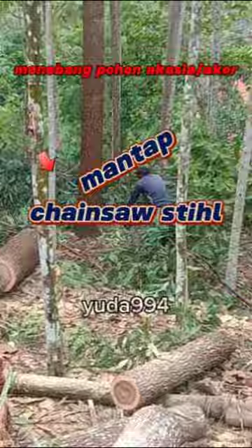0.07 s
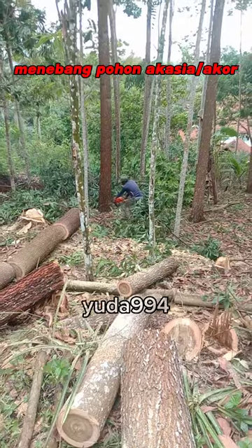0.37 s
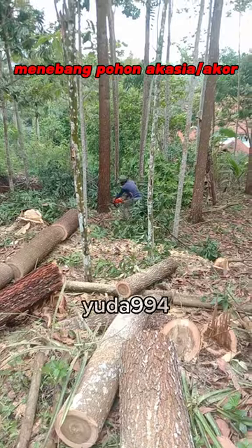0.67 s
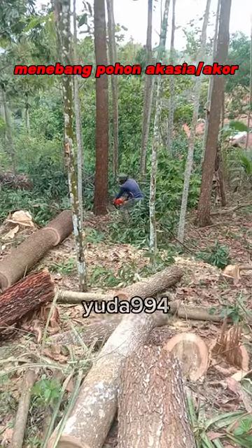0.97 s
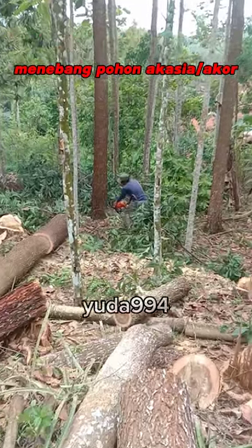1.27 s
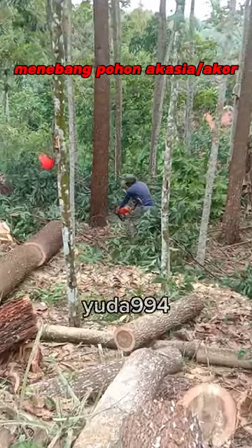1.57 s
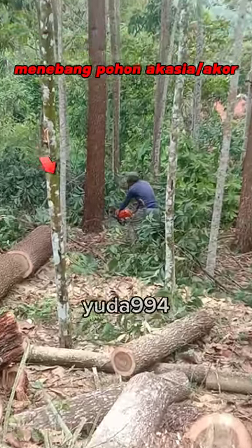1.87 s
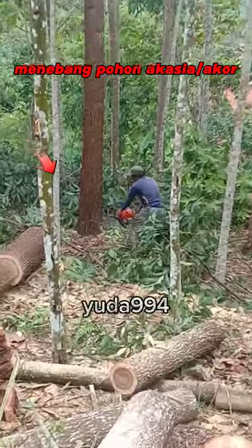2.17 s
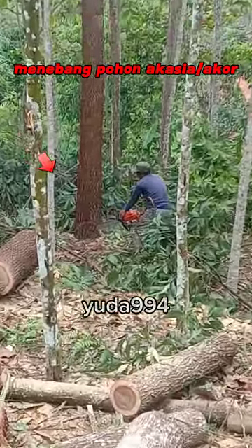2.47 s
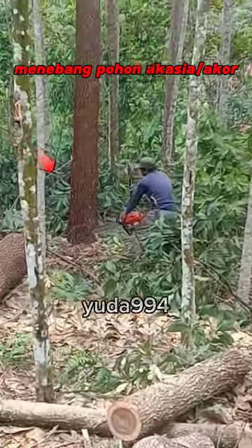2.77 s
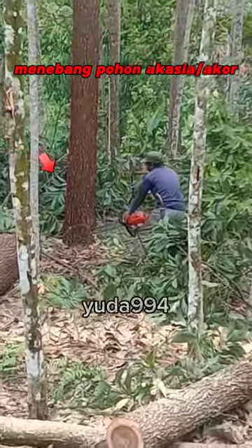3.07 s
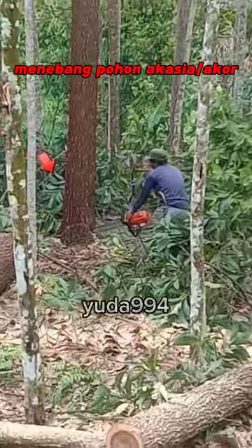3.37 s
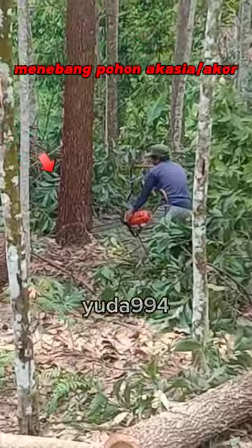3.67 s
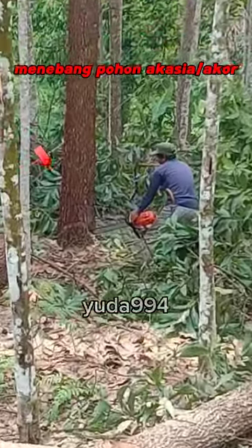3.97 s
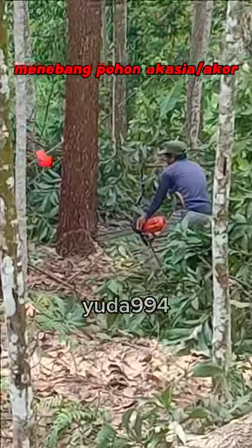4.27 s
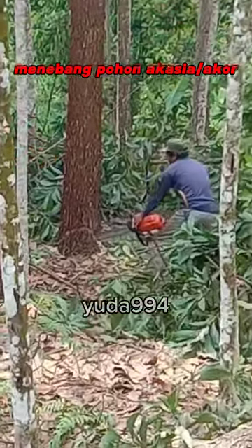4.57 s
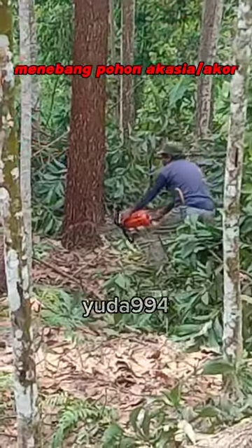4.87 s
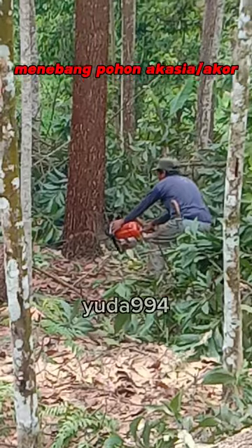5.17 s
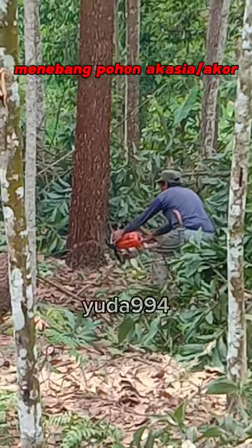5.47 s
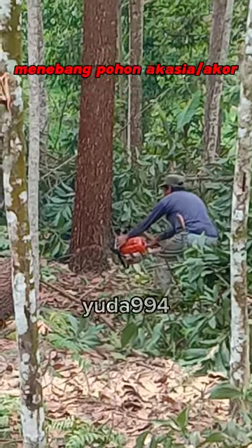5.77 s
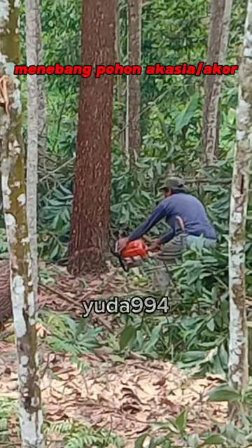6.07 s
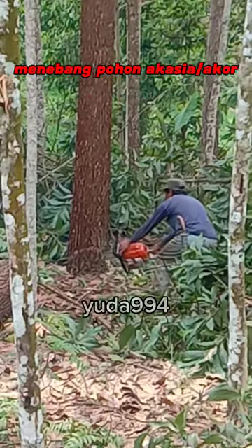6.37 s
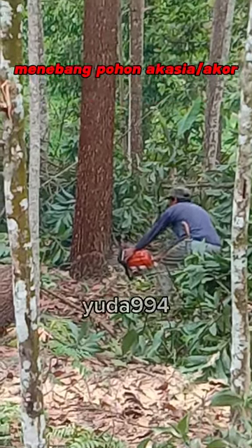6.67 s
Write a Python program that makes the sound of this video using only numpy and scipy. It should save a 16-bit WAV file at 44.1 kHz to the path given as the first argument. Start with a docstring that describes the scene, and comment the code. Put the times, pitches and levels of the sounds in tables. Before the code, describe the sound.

A two-stroke chainsaw cuts into the base of a tree, heard from some metres away in a wood. It fades in at high revs, sputters and sinks a little in pitch under load, while the chain rattles and hisses. About two thirds through, the throttle is let off for an instant; then the engine picks up with a slightly changed tone and climbs. Faint echoes come back from the trees.

```python
"""In a wood, some metres off, a two-stroke chainsaw cuts into the base of a tree.
Each firing is a pressure pulse that rings the muffler; the chain rattles and hisses on the ringing bar.
Engine speed follows the load: the exhaust rasps more at speed and sputters when it is dragged down.
The bar sinks into the trunk. The throttle is briefly let off: the pitch dips and the boom drops out.
It picks up as the saw is swung to a new angle, changing its colour. Trees echo; the air rumbles low."""
import sys
import numpy as np
from scipy import signal
from scipy.fft import rfft, irfft
from scipy.io import wavfile
from scipy.ndimage import uniform_filter1d

SR = 44100
rng = np.random.default_rng(int(sys.argv[2]) if len(sys.argv) > 2 else 0)


def wav_out(sig):
    """Save sig, one row per channel (or a flat mono array), as 16-bit PCM at SR to the path in sys.argv[1]."""
    wavfile.write(sys.argv[1], SR, np.round(np.clip(np.atleast_2d(sig).T, -1, 1) * 32767).astype(np.int16))


N = 295911
TIME = np.arange(N) / SR

LET_OFF = dict(start_s=4.49, attack_s=0.038, hold_s=0.26, release_s=0.14)   # the throttle is let off
DEEP = dict(start_s=1.6, attack_s=1.67, hold_s=1.5, release_s=0.65)   # the trunk muffles the buried bar


def exhaust(turns, rev, sputter, jitter_s=2e-5):
    """Pulse excitation: one firing a turn sets the pitch, and uneven combustion roughens the tone."""
    firings = np.arange(1, int(turns[-1]))
    firing_s = np.interp(firings, turns, TIME)
    uneven = np.interp(firing_s, TIME, sputter)
    volume_dev, timing_dev, front_dev, second_dev = rng.standard_normal((len(firings), 4)).T * uneven
    weak = misfires(firing_s, uneven)
    rebound = 0.63 * np.roll(weak, 1)   # unburnt fuel from a weak firing strengthens the next
    volume = puffs(firing_s, 1 + 0.094 * volume_dev - 0.95 * weak + rebound)
    front = puffs(firing_s + jitter_s * timing_dev, 1 + 0.11 * front_dev - 0.15 * weak)
    # a weaker puff later in each turn colours the harmonics; it all but vanishes with the swing
    second = puffs(np.interp(firings + 0.379, turns, TIME), 1 + 0.11 * second_dev)
    pair = front + np.interp(swing(), [0, 1], [0.36, 0.037]) * second
    return muffler_drone(volume, rev) + muffler_bark(pair) + gas_jet(front, turns, rev, sputter)


def misfires(firing_s, uneven, stumble_share=0.018, stumble_weakness=0.36):
    """Incomplete combustion: each firing's weakness, from set misfires and lesser random stumbles."""
    # weak firings: (time [s], weakness [0-1])
    weak_firings = [(0.419, 1), (0.452, 1), (0.485, 1), (0.779, 1), (0.806, 1), (0.848, 1), (1.079, 1),
                    (1.115, 1), (1.16, 1), (1.221, 0.8), (1.522, 0.75), (2.027, 1), (2.102, 0.8),
                    (2.217, 0.6), (2.278, 0.7), (2.584, 1), (2.804, 0.67), (3.072, 0.76), (3.559, 0.55),
                    (5.579, 0.64), (5.712, 0.92), (5.825, 1)]
    weak = stumble_weakness * (rng.random(len(firing_s)) < stumble_share * uneven)
    for time_s, weakness in weak_firings:
        weak[np.argmin(abs(firing_s - time_s))] = weakness
    return weak


def sputtering(firing_hz, rev):
    """Cyclic variation: the mixture burns unevenly at low speed, while slowing and off the throttle."""
    slowing_hz_per_s = np.maximum(-np.gradient(smooth(firing_hz, size=3000)) * SR, 0)
    return np.clip(0.85 - 0.1 * rev + 0.016 * slowing_hz_per_s + spell(**LET_OFF), 0, 1.5)


def muffler_drone(volume, rev):
    """Forced resonance: the puffs' volume drives the low modes, loudest where the firing rate suits."""
    # muffler modes near the first few harmonics: (frequency [Hz], width [Hz], level [dB])
    boom_modes = [(147.7, 67, 6)]
    octave_modes = [(270, 95, 2.5), (522, 87, -9)]
    body_modes = [(398.4, 95, 0)]
    # boom against engine speed: (revving [steps], level [dB])
    boom_tuning = [(-8, -34.5), (-0.6, -32.5), (0.26, -30.5), (1, -27), (0.4, -29.5), (2.2, -30)]
    # hum of the muffler body: (time [s], level [dB])
    body_levels = [(0.45, -45.5), (0.85, -41), (1.45, -50.5), (1.8, -42), (2.8, -45.5), (3.25, -38),
                   (3.6, -45), (4.3, -42), (4.47, -53), (5.0, -42), (6.1, -40.5), (6.7, -43)]
    throttle_shut = spell(start_s=4.47, attack_s=0.053, hold_s=0.03, release_s=0.07)
    boom_db = np.interp(rev, *np.transpose(boom_tuning)) - 18 * throttle_shut
    octave_db = -34.5 - 1.5 * abs(rev) + drift(3) - 2 * spell(**LET_OFF) + 0.5 * swing()
    boom = radiate(volume, boom_modes, boom_db)
    octave = radiate(volume, octave_modes, octave_db)
    return boom + octave + radiate(volume, body_modes, in_time(body_levels)[0])


def muffler_bark(pulses):
    """Impulse response: the sharp pulse fronts ring the muffler's middle modes."""
    # middle modes of the muffler: (frequency [Hz], width [Hz], level [dB])
    pipe_modes = [(692, 326, -1.1), (879, 99, 0.21)]
    bark_modes = [(1067, 188, 0)]
    ring_modes = [(1283, 142, 10), (1440, 120, -4)]
    # their strength: (time [s], pipe level [dB], bark level [dB], ring level [dB])
    mode_levels = [(0.45, -31, -39, -28.5), (1.1, -30.5, -36.5, -29.5), (1.35, -30.5, -40, -29.5),
                   (1.75, -29.5, -31, -28.5), (2.2, -31, -32, -27.5), (2.55, -33.5, -32.5, -30.5),
                   (3.2, -32, -30.5, -30.5), (3.7, -35.5, -30.5, -31), (4.05, -32, -29.5, -29.5),
                   (4.3, -36, -26.5, -36), (4.5, -40, -29.5, -38), (4.6, -35, -50, -33),
                   (4.8, -34.5, -44, -28), (4.95, -34.5, -29, -33), (5.4, -48, -29.5, -27),
                   (5.95, -40, -30, -30.5), (6.3, -47, -30, -26), (6.7, -47, -34, -28)]
    pipe_db, bark_db, ring_db = in_time(mode_levels)
    pipe = radiate(pulses, pipe_modes, pipe_db)
    bark = radiate(pulses, bark_modes, bark_db)
    ring = radiate(pulses, ring_modes, ring_db + 1.23 * drift(6))
    return pipe - bark + ring


def gas_jet(front, turns, rev, sputter):
    """Flow noise: turbulent gas excites the muffler, louder and brighter as the engine speeds up."""
    # modes excited by the flow: (frequency [Hz], width [Hz], level [dB])
    gas_modes = [(184, 29, -6), (298, 124, -14), (946, 480, -4.5), (1282, 107, 7.5), (1564, 164, -3)]
    rasp_modes = [(1964, 290, 0), (2233, 260, 1), (2500, 240, -3)]
    high_modes = [(2770, 290, -2), (3083, 290, -0.5), (3082, 61, -1.5), (3530, 270, -4.5)]
    flow = np.maximum(rev, -1.6)   # at lower speeds the rasp fades no further
    muffled_db = -2.5 * spell(**DEEP)
    flow_db = -32 + 1.62 * flow + muffled_db
    rush = radiate(gated_noise(turns, depth_db=3, lag=0.77), gas_modes, flow_db + 0.65 - swing())
    # the jet is pitched when the engine pulls evenly, noisy when it sputters
    jet = 0.34 * front + 0.79 * per_turn(turns) + 0.92 * sputter * rms_one(rng.standard_normal(N))
    rasp_db = flow_db + 1.4 * swing()
    tilt_db = 1.7 * flow   # revving moves the rasp from its lowest mode to the upper ones
    low = radiate(jet, rasp_modes[:1], rasp_db - 5 - tilt_db)
    upper = radiate(jet, rasp_modes[1:], rasp_db - 2.5 + tilt_db / 2)
    frayed = jet + 0.88 * gated_noise(turns, depth_db=3.5, lag=0.2)
    high = radiate(frayed, high_modes, -33.5 + 1.4 * flow + muffled_db)
    return rush + low - upper + high


def chain(turns, rev):
    """Impact noise: the links, jerked by every turn of the crank, chatter on the ringing bar."""
    # modes of chain and bar: (frequency [Hz], width [Hz], level [dB])
    rattle_modes = [(4170, 360, 0.5), (4280, 22, 6.5), (4520, 270, -1), (5063, 300, 0), (5356, 190, 4)]
    bar_modes = [(6000, 370, 0.45), (6236, 330, -1), (6215, 49, 0.52)]
    hiss_modes = [(6906, 193, 1.5), (7223, 224, 2.5), (7543, 320, -0.5), (7860, 400, -10),
                  (8380, 490, -8.5), (9400, 620, -12.5), (10310, 650, -14.5), (11300, 780, -22.5),
                  (12800, 1600, -31)]
    sizzle_modes = [(13700, 700, -13), (14150, 130, 1), (14700, 500, -3), (15300, 550, -0.5)]
    # treble of the cut: (time [s], bar level [dB], hiss level [dB])
    cut_levels = [(0.45, -25.5, -26), (1.3, -25.5, -27), (1.85, -27.5, -26), (2.4, -24, -26),
                  (2.9, -24.5, -24.5), (3.15, -25, -27.5), (3.7, -23.5, -30.5), (4.45, -26.5, -29.5),
                  (4.7, -25, -25.5), (5.4, -28, -26.5), (6.1, -28.5, -27.5), (6.35, -25.5, -27),
                  (6.7, -26, -27.5)]
    bar_db, hiss_db = in_time(cut_levels)
    bite_db = 0.5 * np.cos(np.pi * turns) + 0.61 * drift(24)   # cutters bite every second turn
    bite = from_db(bite_db) * (1 + 0.14 * snags())
    regular = 0.37 * per_turn(turns)
    slap = bite * (regular + gated_noise(turns, depth_db=1.5, lag=0.14))
    links = bite * (regular + gated_noise(turns, depth_db=1.5, lag=0.44))
    rattle = radiate(slap, rattle_modes, -27.5 + 0.8 * rev - 0.5 * spell(**DEEP) - 1.5 * swing())
    bar = radiate(links, bar_modes, bar_db)
    hiss = radiate(links, hiss_modes, hiss_db)
    flare = spell(start_s=3.674, attack_s=0.25, hold_s=0.45, release_s=0.15)
    sizzle = radiate(links, sizzle_modes, -40 + 4 * flare + 1.5 * swing())
    feed = from_db(0.54 * drift(7.4))   # the feed into the wood varies
    return feed * (rattle + bar + hiss + sizzle)


def snags(per_s=260, decay_s=0.00053):
    """Shot noise: cutters snag at random, each snag decaying exponentially. Mean 0, rms 1."""
    hits = (rng.random(N) < per_s / SR) * rng.uniform(0.36, 1, N)
    swell = signal.lfilter([1], [1, -np.exp(-1 / (decay_s * SR))], hits)
    return rms_one(swell - swell.mean())


def tree_echoes(saw, echo_db=-19, count=10):
    """Reflection: the surrounding trunks return faint, dull, delayed copies of the saw."""
    dull = signal.sosfilt(signal.butter(1, [600, 5000], "band", fs=SR, output="sos"), saw)
    lags = (rng.uniform(0.017, 0.16, count) * SR).astype(int)
    return from_db(echo_db) * sum(np.pad(dull, (lag, 0))[:N] for lag in lags) / np.sqrt(count)


def air(start_db=-66, rise_db=7):
    """Ambient noise: the low rumble of the open air, slowly growing."""
    band = signal.butter(1, [25, 120], "band", fs=SR, output="sos")
    rumble = signal.sosfilt(band, rng.standard_normal(N))
    return from_db(start_db + rise_db * TIME / TIME[-1]) * rms_one(rumble)


def radiate(drive, modes, level_db, size=8192):
    """Resonance: steep-sided minimum-phase modes ring after each impulse, their sum held at level_db."""
    f = np.arange(size // 2 + 1) * SR / size
    power = sum(from_db(db) ** 2 / (1 + (2 * (f - hz) / width) ** 4) for hz, width, db in modes)
    power = power * f ** 2 / (f ** 2 + modes[0][0] ** 2 / 2) + 1e-9   # nothing radiates at 0 Hz
    cepstrum = irfft(np.log(power) / 2)
    cepstrum[1:size // 2] *= 2   # folding the cepstrum makes the response causal
    cepstrum[size // 2 + 1:] = 0
    response = irfft(np.exp(rfft(cepstrum)))[:size // 2]
    ringing = signal.oaconvolve(drive, response)[:N]
    running_rms = np.sqrt(np.maximum(smooth(ringing ** 2, size=4400), 1e-16))
    return from_db(level_db) * ringing / running_rms


def puffs(firing_s, strength):
    """Pulse train: one impulse per firing, shared between the two nearest samples."""
    train, position = np.zeros(N + 1), np.clip(firing_s * SR, 0, N - 1)
    whole = position.astype(int)
    np.add.at(train, whole, strength * (1 - position + whole))
    np.add.at(train, whole + 1, strength * (position - whole))
    return rms_one(train[:N])


def gated_noise(turns, depth_db, lag):
    """Amplitude modulation: noise swells once a turn, peaking lag turns after the firing."""
    return rms_one(rng.standard_normal(N) * from_db(depth_db * np.cos(2 * np.pi * (turns - lag))))


def per_turn(turns, size=400):
    """Periodicity: a ragged pattern that repeats on every turn of the crank is heard as pitched."""
    return rms_one(np.interp(turns, np.arange(size) / size, rng.standard_normal(size), period=1))


def drift(rate_hz, hop=40, settle=2000):
    """Slow random fluctuation: noise low-passed at rate_hz, with rms 1."""
    pole = np.exp(-2 * np.pi * rate_hz * hop / SR)
    noise = rng.standard_normal(N // hop + settle + 2)
    slow = signal.lfilter([1], [1, -2 * pole, pole * pole], noise)[settle:]
    return np.interp(np.arange(N) / hop, np.arange(len(slow)), rms_one(slow))


def swing(start_s=4.72, length_s=0.42):
    """How far the saw has been swung to its new angle, 0 to 1."""
    return np.clip((TIME - start_s) / length_s, 0, 1)


def spell(start_s, attack_s, hold_s, release_s):
    """A trapezoidal envelope from 0 to 1 and back."""
    return np.interp(TIME, start_s + np.cumsum([0, attack_s, hold_s, release_s]), [0, 1, 1, 0])


def in_time(rows):
    """Each column after the time column as a curve over all samples."""
    time_s, *columns = np.transpose(rows)
    return [np.interp(TIME, time_s, column) for column in columns]


def smooth(x, size):
    """Triangular moving average."""
    return uniform_filter1d(uniform_filter1d(x, size), size)


def from_db(db):
    """Decibels to amplitude ratio."""
    return 10 ** (np.asarray(db) / 20)


def rms_one(x):
    """Scales x to rms 1."""
    return x / np.sqrt(np.mean(x ** 2) + 1e-20)


def scene(cruise_hz=133, step_hz=10, wobble=0.0026):
    """Superposition: one crank drives chain and exhaust; echoes and air join, alike in both channels."""
    # engine speed: (time [s], firing rate [Hz])
    engine_speed = [(0.2, 148.0), (0.38, 155.8), (0.51, 148.1), (0.77, 150.9), (0.85, 144.1), (0.94, 146.1),
                    (1.23, 128.4), (1.29, 130.9), (1.41, 128.7), (1.82, 134.5), (2.15, 131.2),
                    (2.46, 130.9), (2.58, 128.0), (2.91, 127.8), (3.08, 124.3), (3.33, 124.3),
                    (3.51, 128.0), (3.72, 128.3), (3.86, 125.7), (4.52, 138.1), (4.6, 108.3), (4.63, 104.7),
                    (4.74, 123.6), (4.84, 126.5), (4.93, 131.5), (5.14, 134.7), (5.28, 139.4),
                    (5.64, 137.5), (5.76, 131.9), (6.13, 134.8), (6.44, 147.0), (6.69, 148.6)]
    firing_hz = smooth(in_time(engine_speed)[0], size=500)
    turns = np.cumsum(firing_hz * (1 + wobble * drift(13))) / SR
    rev = (firing_hz - cruise_hz) / step_hz   # revving, in steps above cruising speed
    saw = chain(turns, rev) + exhaust(turns, rev, sputtering(firing_hz, rev))
    return np.tile(saw + tree_echoes(saw) + air(), (2, 1))


def record(dry):
    """Fade and band limit: the sound rises out of silence, and a steep low-pass cuts the top."""
    start_s, fade_s, cutoff_hz = 0.18, 0.27, 15600
    faded = dry * np.interp(TIME, [start_s, start_s + fade_s], [0.052, 1], left=0)
    return signal.sosfilt(signal.ellip(12, 0.1, 90, cutoff_hz, fs=SR, output="sos"), faded)


dry = scene()
out = record(dry)
wav_out(out)
```